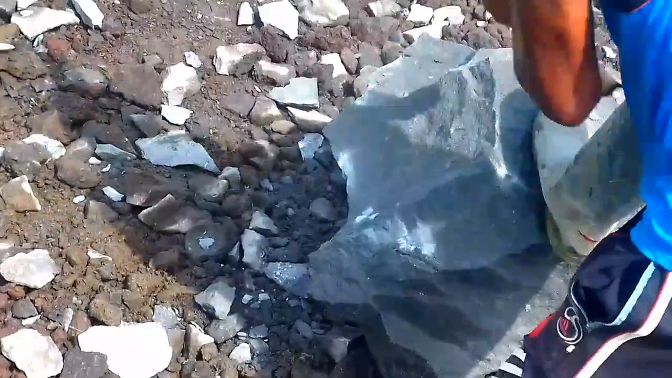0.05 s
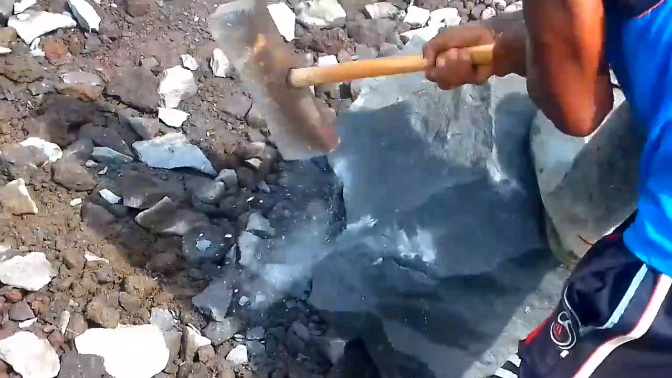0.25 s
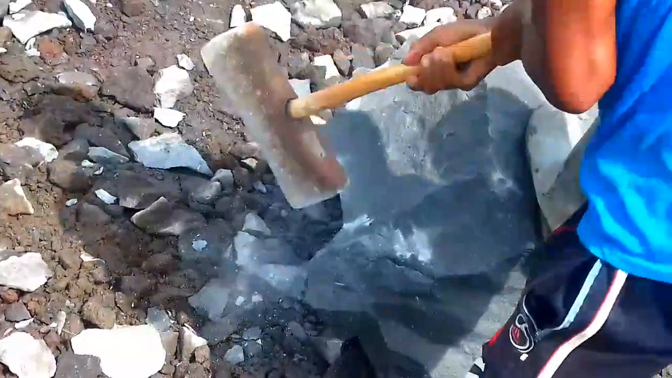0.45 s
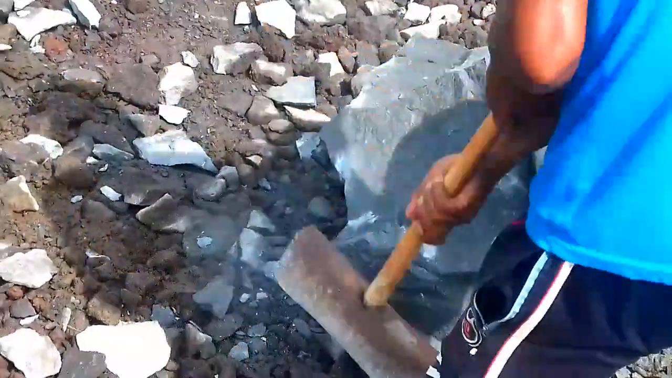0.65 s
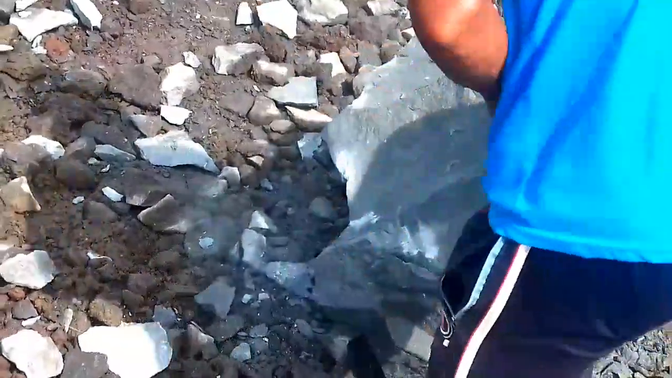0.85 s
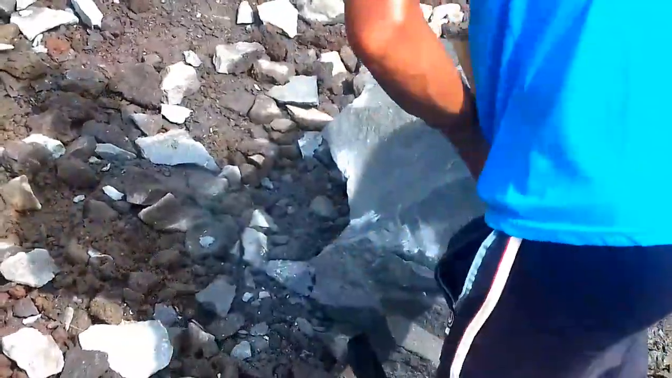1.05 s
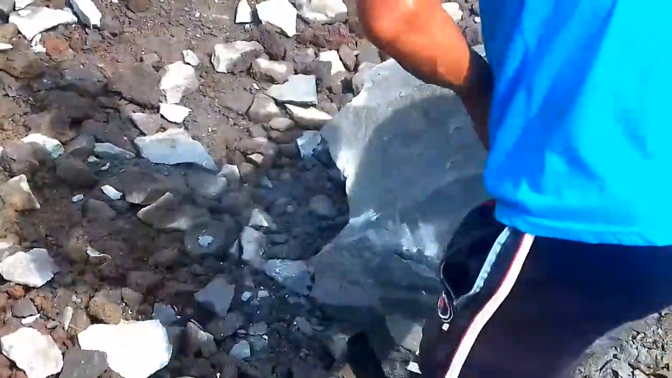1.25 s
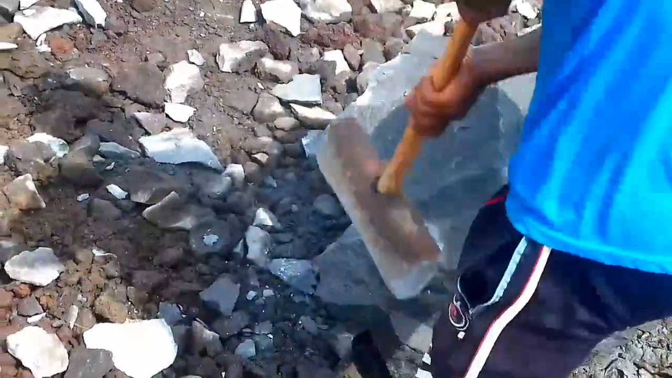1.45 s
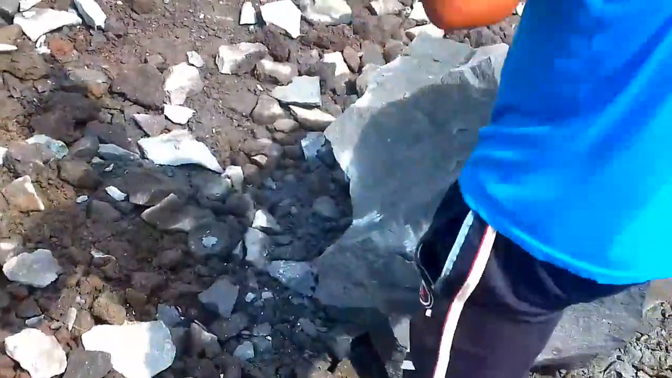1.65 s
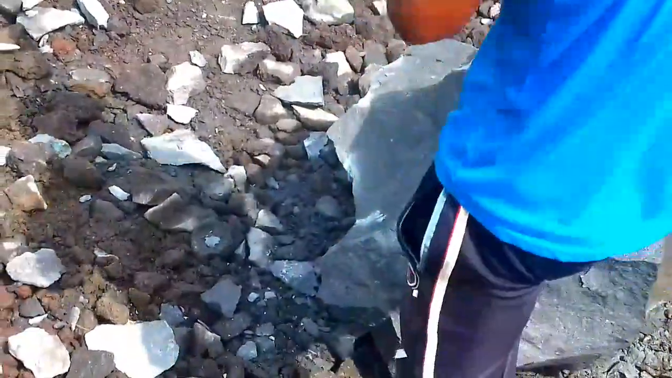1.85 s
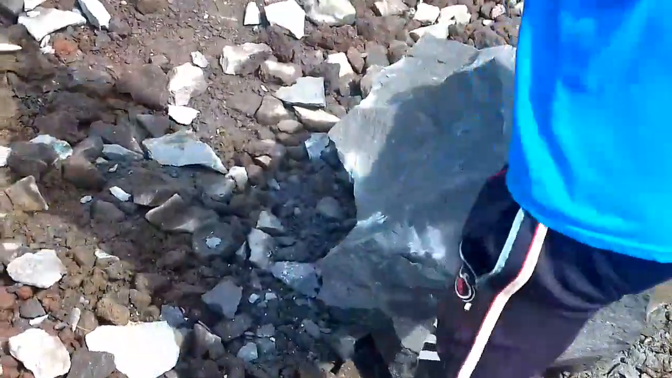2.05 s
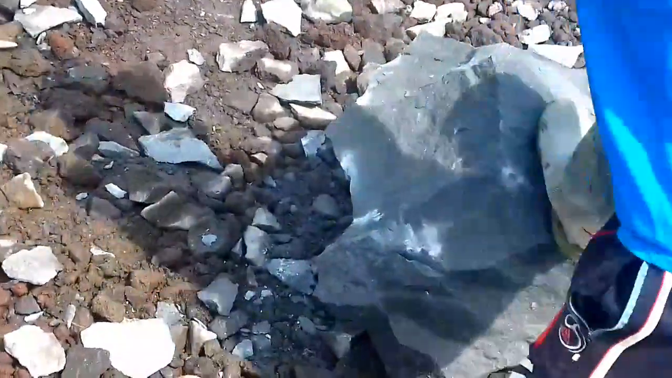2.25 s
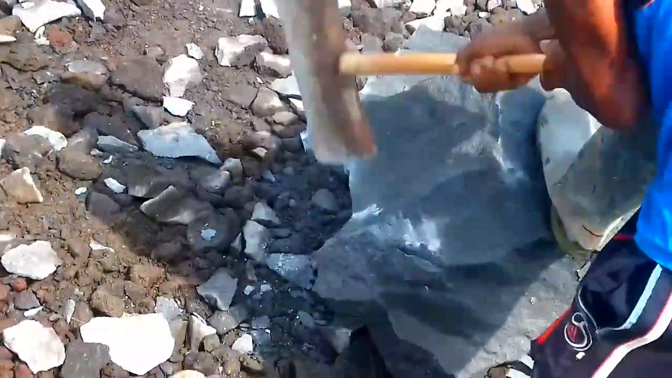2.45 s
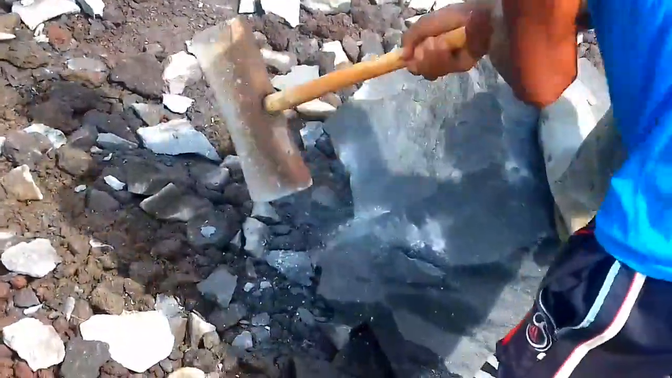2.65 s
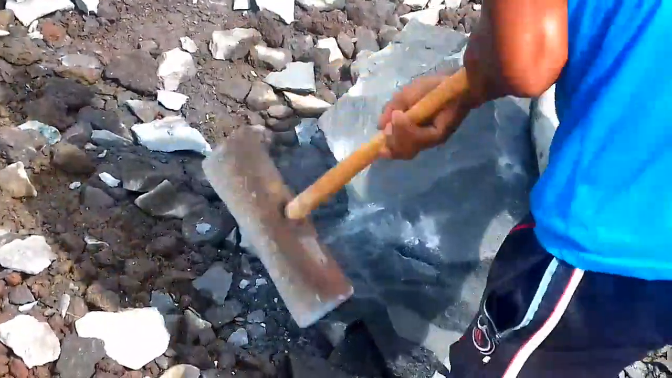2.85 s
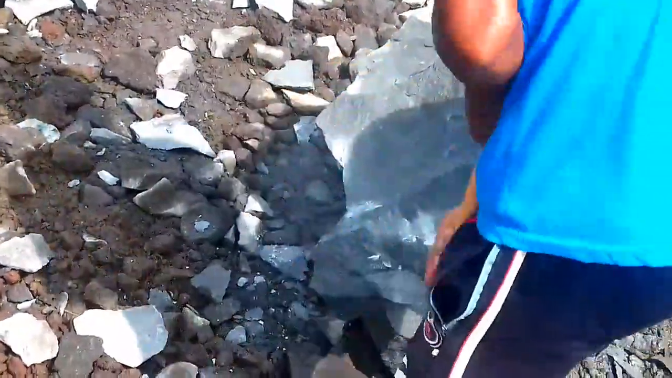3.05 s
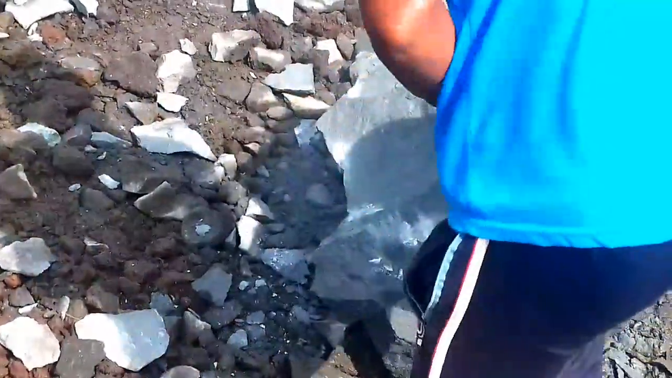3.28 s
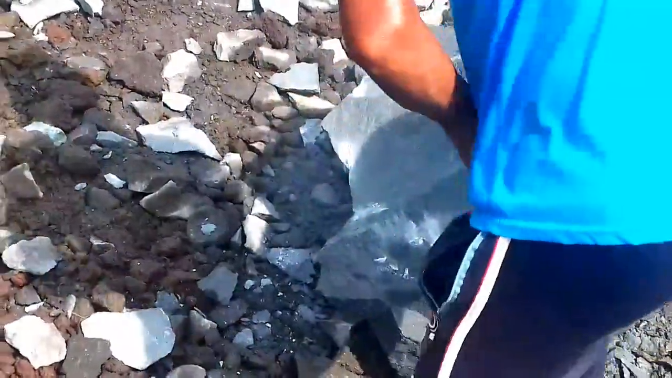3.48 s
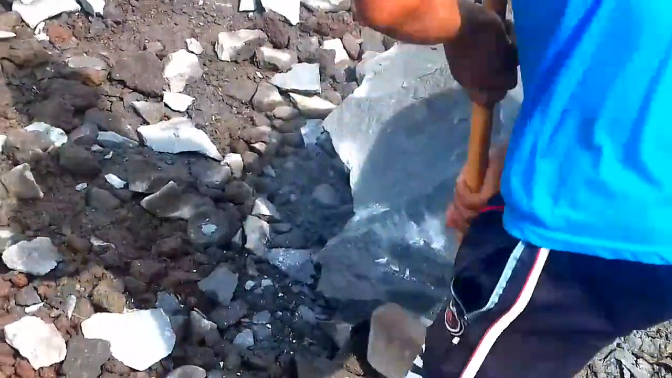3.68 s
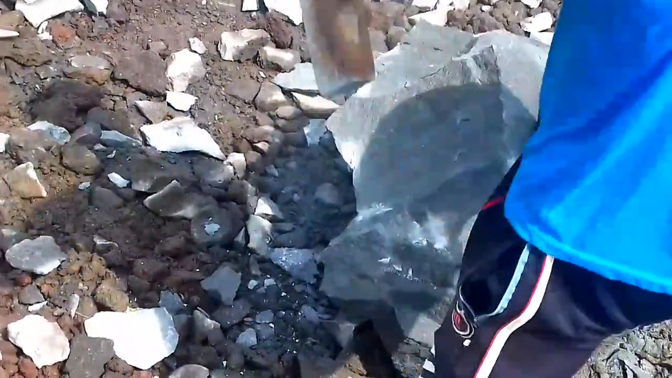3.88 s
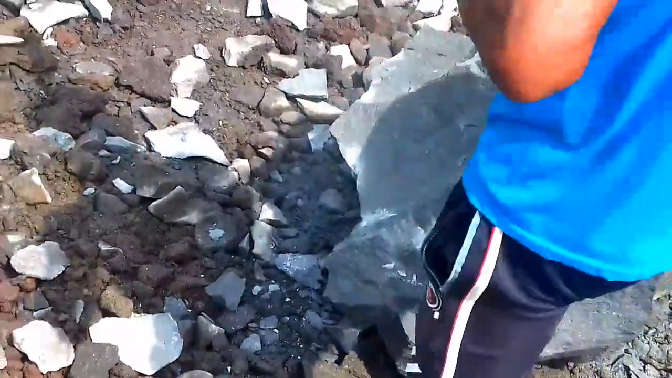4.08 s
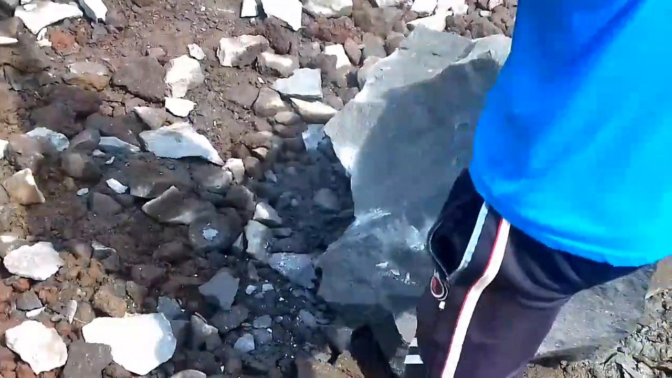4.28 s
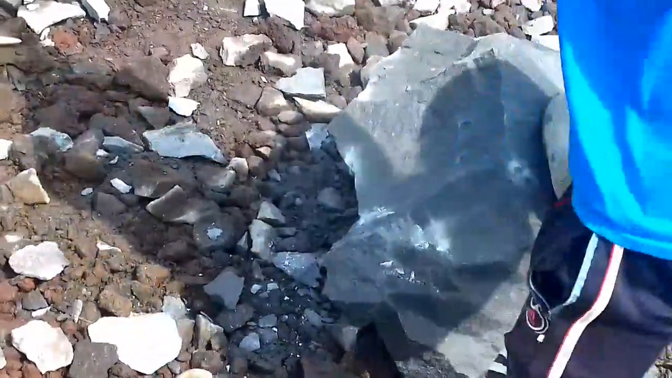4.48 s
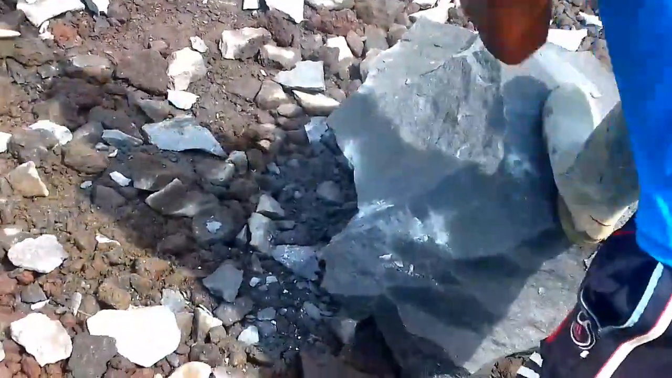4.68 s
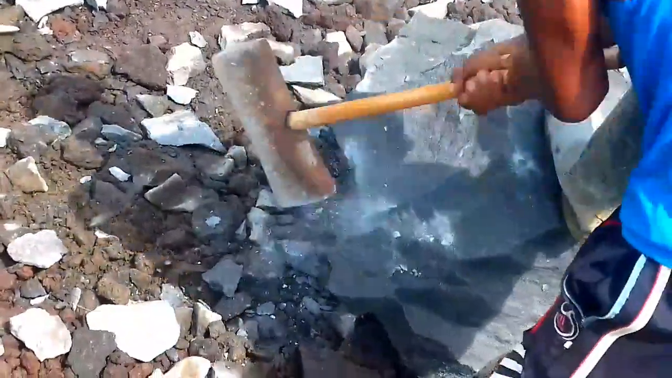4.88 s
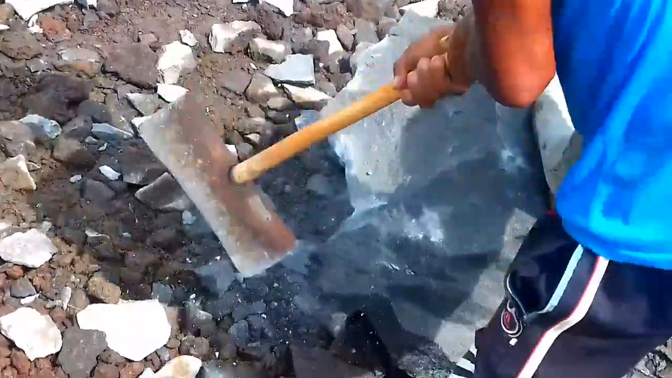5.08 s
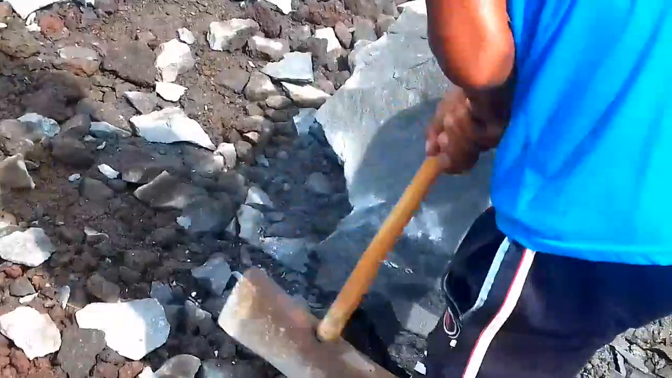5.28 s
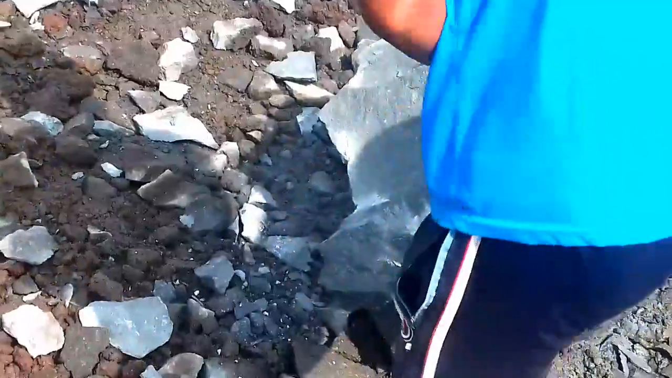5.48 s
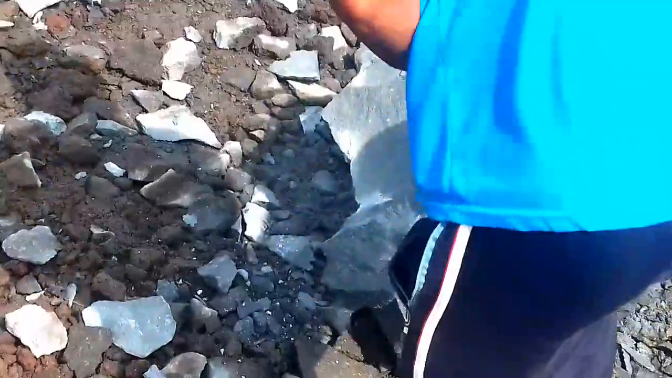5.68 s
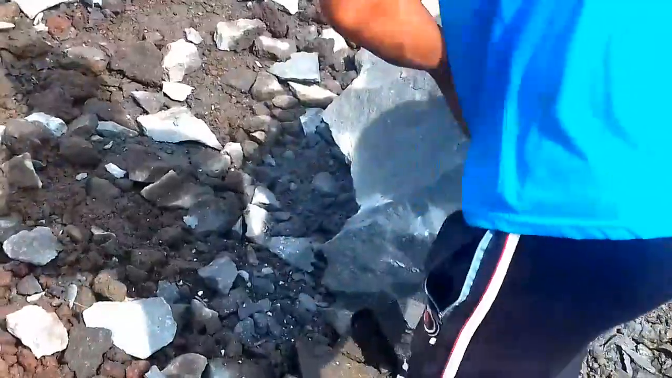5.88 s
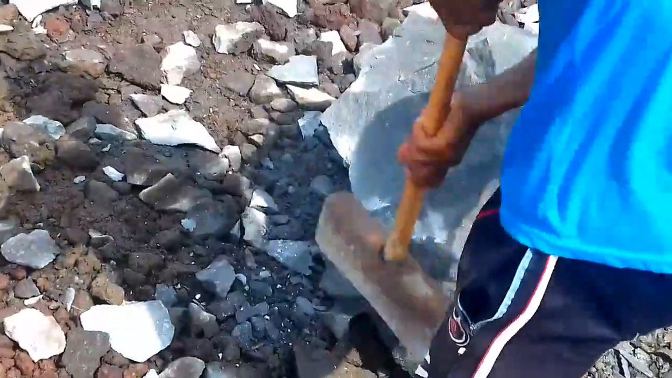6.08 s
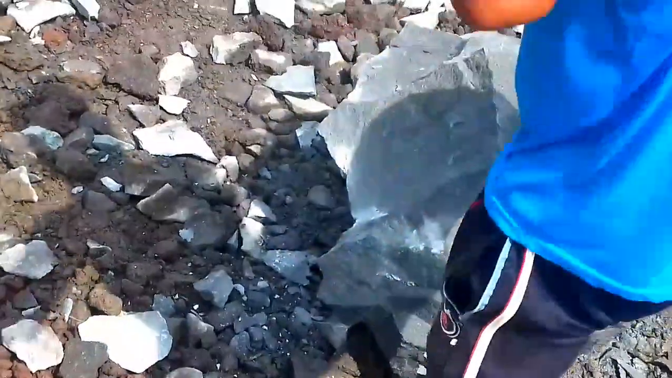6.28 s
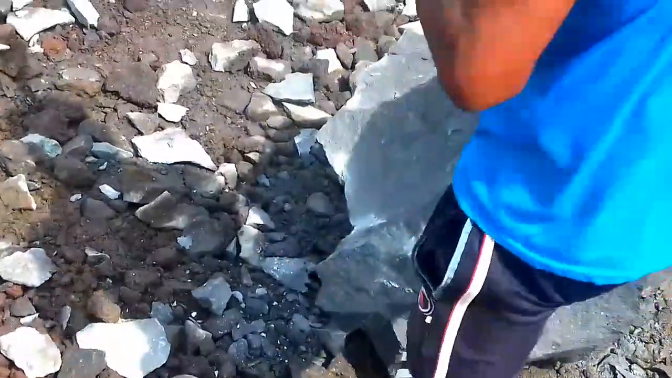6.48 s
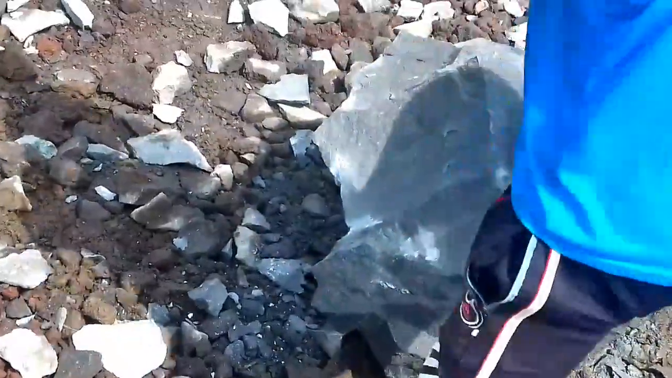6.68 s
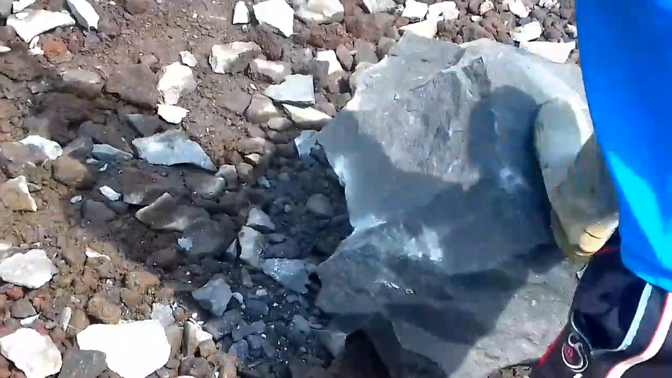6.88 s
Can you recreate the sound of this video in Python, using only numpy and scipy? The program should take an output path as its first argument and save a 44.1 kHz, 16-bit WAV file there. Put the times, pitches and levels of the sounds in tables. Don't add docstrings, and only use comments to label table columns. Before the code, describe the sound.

Outdoors in a quarry, a sledgehammer strikes a boulder three times, over two seconds apart, each a hard clipped crack with a short boom and a high, wavering steel ring. From the second blow on, a lighter hammer knocks stone about every half second, bright and dry with faint wall echoes. Chips click, a boot briefly scuffs grit, and a far engine drones. A close phone microphone ducks after blows, and hiss creeps back.

```python
import sys
import numpy as np
from scipy import signal
from scipy.fft import rfft, irfft
from scipy.io import wavfile
from scipy.ndimage import uniform_filter1d

SR = 44100
rng = np.random.default_rng(int(sys.argv[2]) if len(sys.argv) > 2 else 0)


def elevation(decibels):
    levels = np.asarray(decibels, float)
    return 10 ** (levels / 20)


def store_wav(level_fs):
    pcm = np.round(np.clip(np.atleast_2d(level_fs), -1, 1) * 32767)
    wavfile.write(sys.argv[1], SR, pcm.T.astype(np.int16))


N = 305613


def evened(x):
    return x / np.sqrt(np.mean(x ** 2) + 1e-20)


def read(points, hz):
    f, value = np.transpose(points)
    return np.interp(np.log(hz + 1), np.log(f + 1), value)


def add(mix, s, sound):
    part = mix[round(s * SR):][:len(sound)]
    part += sound[:len(part)]


def swell(t, rise_s):
    return -np.expm1(-t / rise_s)


def colour_of(x, colour):
    gain = elevation(read(colour, np.fft.rfftfreq(len(x), 1 / SR)))
    return evened(irfft(rfft(x) * gain, len(x)))


def noise(colour, size):
    return colour_of(rng.standard_normal(size), colour)


def band(lo_hz, hi_hz, size):
    return noise([(lo_hz / 1.6, -40), (lo_hz, 0), (hi_hz, 0), (hi_hz * 1.4, -40)], size)


def fuzzy(hz, width_hz, size):
    away = (np.fft.rfftfreq(size, 1 / SR) - hz) / width_hz * 2
    return evened(irfft(rfft(rng.standard_normal(size)) / (1 + away ** 2), size))


def mode(hz, db, t60, t):
    return elevation(db - 60 * t / t60) * np.sin(2 * np.pi * hz * t)


def dying(colour, t60s, rise_s, size):
    hz, t, z = signal.stft(noise(colour, size), SR, nperseg=256)
    decay = elevation(-60 * t / read(t60s, hz)[:, None])
    tail = signal.istft(z * decay, SR, nperseg=256)[1][:size]
    return tail * swell(np.arange(size) / SR, rise_s)


# pitch_hz, level_db (per Hz)
BOULDER = [(190, -39.5), (330, -4.5), (458, -3), (635, -8), (1070, 0), (1350, -1), (2030, -1), (3060, -17),
           (4680, -11), (5790, -28.5), (13300, -41), (16500, -63)]


def bite(crack_db, t):
    jolts = 0
    for at, db in [(0, 4), (.002, -2.5), (.005, -9.5), (.008, -20.5)]:
        jolts = jolts + elevation(db - 60 * (t - at) / 0.018) * (t > at)
    return elevation(crack_db - 1.5) * noise(BOULDER, len(t)) * jolts * swell(t, 0.00068)


# pitch_hz, t60_s
BOULDER_T60 = [(100, 0.069), (400, 0.1), (1200, .13), (2500, 0.069), (4500, .05), (6500, 0.016),
               (15000, .008)]


def boulder_boom(boom_db, hollow_db, thump_db, t):
    boom = elevation(boom_db + 6.5) * dying(BOULDER, BOULDER_T60, 0.0038, len(t))
    hollow = elevation(hollow_db - 60 * t / .08) * band(750, 900, len(t)) * swell(t, 0.018)
    thump = elevation(thump_db + 4.5 - 60 * t / 0.076) * band(150, 330, len(t)) * swell(t, .003)
    return boom + hollow + thump


def splinter_spray(grit_db, t):
    ticks = rng.standard_normal(len(t)) * (rng.random(len(t)) < 900 / SR)
    colour = [(200, -28), (600, -7.5), (1500, -3), (2300, -9), (3200, -26.5), (5500, -43.5), (7500, -89.5)]
    return elevation(grit_db - 60 * t / 0.22) * colour_of(ticks, colour) * swell(t, 0.0059)


HEAD_HZ = [3760, 4585, 7997, 8415, 9120, 14160, 4398]
# t60_s, then level_db at each of the three blows
HEAD = [(0.12, -28, -25, -32.5), (0.18, -19.5, -16.5, -33), (0.19, -43.5, -47.5, -56),
        (0.41, -57.5, -50, -67.5), (0.24, -45, -44, -50.5), (.16, -54, -61, -76), (.1, -40.5, -51.5, -51)]


def head_ring(blow, t):
    rate_hz = rng.uniform(2.9, 10, (len(HEAD), 1))
    phase = rng.uniform(0, 0.72, (len(HEAD), 1))
    waver = 1 - 0.27 * np.cos(2 * np.pi * (rate_hz * t + phase))
    ring = 0
    for hz, (t60, *db), w in zip(HEAD_HZ, HEAD, waver):
        ring = ring + elevation(db[blow] - 60 * (t / t60) ** 1.5) * np.sin(2 * np.pi * hz * t) * w
    return ring * -np.expm1(-(t / 0.02) ** 2)


SLEDGE_AT = [
    .2736,
    2.6073,
    4.9545,
]
# crack_db, boom_db, grit_db, hollow_db, thump_db
SLEDGE = [
    (-2.5, -20, -45, -19.5, -22.5),
    (-3.5, -23, -44.5, -18.5, -32.5),
    (-5, -26, -30, -19, -35),
]


def sledge():
    out, t = np.zeros(N), np.arange(16384) / SR
    for blow, (s, levels) in enumerate(zip(SLEDGE_AT, SLEDGE)):
        crack_db, boom_db, grit_db, hollow_db, thump_db = levels
        stone = bite(crack_db, t) + boulder_boom(boom_db, hollow_db, thump_db, t)
        add(out, s, stone + splinter_spray(grit_db, t) + head_ring(blow, t))
    return out


# level_db (as it lifts off), t60_s
SING_BLOW = [
    (-19.5, 1.274),
    (-24, 1.46),
    (-24, 1.414),
]
# start_s (centre), depth_db, width_s
TURNS = [(.331, -7, 0.0082), (.387, -12.5, 0.018), (.45, -5, 0.024), (.5, -7, 0.021), (.605, -6, 0.054),
         (0.652, -24, 0.036), (.825, -11, .05), (.87, -32, 0.027), (.955, -18, 0.011), (1.036, -1, 0.0078),
         (1.093, -14, .03), (1.17, -26, 0.083), (1.245, -20, 0.061), (1.315, -19, 0.05),
         (2.705, -26, 0.024), (2.725, -16, 0.012), (2.882, -2.5, 0.021), (3.09, -7, 0.032),
         (3.117, -10, 0.024), (3.178, -24, 0.032), (3.22, -22, 0.036), (3.335, -11, 0.014),
         (3.58, -16, 0.16), (3.69, -14, .04), (5.09, -4.5, 0.047), (5.3, -10, 0.075), (5.519, -12, 0.034),
         (5.615, -8, .015), (5.756, -22, 0.029), (5.97, -19, .04)]
SING_HZ, SING_LIFT_S, SING_END_S = 5432, 0.025, 1.19


def sing():
    out, t = np.zeros(N), np.arange(round(SING_END_S * SR)) / SR
    edges = -np.expm1(-(t / SING_LIFT_S) ** 3) * np.clip((SING_END_S - t) / 0.017, 0, 1)
    for s, (db, t60) in zip(SLEDGE_AT, SING_BLOW):
        add(out, s, edges * mode(SING_HZ, db, t60, t))
    for s, depth_db, width_s in TURNS:
        near = slice(round((s - .3) * SR), round((s + .3) * SR))
        away = ((np.arange(N)[near] / SR - s) / width_s) ** 2
        out[near] *= np.sqrt(1 - (1 - elevation(2 * min(depth_db, 0))) * np.exp(-away))
    return out


KNOCK_HZ, KNOCK_T60 = 4500, 0.019


def stone_knock(body_db, thud_db, treble_db, t):
    thud_hold = elevation(15 * np.minimum(t, .03) / KNOCK_T60)
    stone = elevation(body_db) * band(1000, 2400, len(t))
    stone += elevation(thud_db + 3) * band(190, 850, len(t)) * thud_hold
    knock = fuzzy(KNOCK_HZ, 1400, len(t)) + elevation(treble_db) * band(5000, 12000, len(t))
    knock = knock * elevation(-60 * t / KNOCK_T60) + stone * elevation(-48 * t / KNOCK_T60)
    return knock * swell(t, .0005)


def beating_twins(hz, db, split_hz, share, t60, t):
    twins = mode(hz, db, t60, t)
    twins += np.clip(share, -1, 1) * mode(hz + split_hz, db, 1.44 * t60, t)
    linger_db = db - 31
    return twins + elevation(linger_db - 60 * t / 0.25) * fuzzy(hz + split_hz / 2, 60, len(t))


LIGHT_HZ = [7260, 8850, 9200, 11100, 13130, 10550, 15140, 4200, 1930, 2250]
# level_db, t60_s
LIGHT_HEAD = [(-38.5, 0.04), (-36.5, 0.062), (-40, 0.091), (-43.5, 0.025), (-44, 0.039), (-40, 0.075),
              (-43, .07), (-35.5, 0.06), (-21, 0.041), (-33.5, 0.058)]


def upper_modes(t):
    upper = 0
    for hz, (db, t60) in zip(LIGHT_HZ, LIGHT_HEAD):
        blow_db = db + 4 * rng.standard_normal()
        upper = upper + elevation(blow_db - 60 * t / t60) * fuzzy(hz, 110, len(t))
    return upper


TAP_AT = [2.316, 2.8523, 3.3868, 4.0745, 4.6058, 5.1246, 5.6417, 6.1615, 6.6757]
# crack_db, then against it body_db, thud_db, treble_db
TAPS = [(-4, -19.5, -35, -22), (-9, -11.5, -24, -31), (-7.5, -20, -44, -31), (-8.5, -10.5, -28.5, -24),
        (-5.5, -10.5, -35.5, -26), (-8.5, -18, -34, -25), (-10.5, -19.5, -25.5, -27),
        (-9.5, -10.5, -26, -21.5), (-5.5, -11, -23, -27.5)]
# pitch_hz, level_db, split_hz, share (of the twin, -1 to 1), t60_s
TWINS = [(3665, -12, 27, 0.52, 0.069), (3610, -24, 34, 0.97, 0.056), (3610, -13.5, 65, -0.71, 0.062),
         (3670, -13.5, 64, 0.56, 0.042), (3597, -9.5, 74, -0.28, 0.088), (3760, -20, 85, 0.65, 0.036),
         (3527, -19.5, 83, -1.03, 0.042), (3570, -11, 88, -0.96, .06), (3620, -9, 105, 0.95, 0.037)]
# pitch_hz, level_db (per Hz)
SCATTER = [(290, -58), (500, -29.5), (1200, -18), (1950, -17), (3160, -31.5), (3660, 0.5), (3880, -12.5),
           (5930, -30.5), (9060, -29), (15600, -40), (16500, -85.5)]
# pitch_hz, t60_s
SCATTER_T60 = [(800, 0.048), (2500, 0.35), (3600, 0.24), (4500, 0.6), (8000, 0.17), (15000, .08)]


def light_hammer():
    out, t = np.zeros(N), np.arange(12288) / SR
    for s, (crack_db, body_db, thud_db, treble_db), twin in zip(TAP_AT, TAPS, TWINS):
        knock = elevation(crack_db - 2.5) * stone_knock(body_db, thud_db, treble_db, t)
        upper_db = 0.47 * twin[1] + 0.58 * (treble_db + crack_db) + 19
        ring = beating_twins(*twin, t) + elevation(upper_db) * upper_modes(t)
        scatter = elevation(crack_db - 34.5) * dying(SCATTER, SCATTER_T60, 0.0027, len(t))
        add(out, s, knock + ring * swell(t, 0.00096) + scatter)
    return out


# start_s, pitch_hz, level_db, length_s
WALL = [(2.587, 3890, -42.5, 0.0064), (3.443, 3610, -34.5, 0.012), (3.758, 3720, -56.5, 0.012),
        (4.3228, 3670, -38.5, 0.006), (4.8378, 3605, -41.5, 0.008), (5.355, 3630, -55.5, 0.0085),
        (5.868, 3600, -51.5, 0.033), (6.383, 3630, -56, 0.036)]


def wall_returns():
    out, t = np.zeros(N), np.arange(12288) / SR
    for s, hz, db, length_s in WALL:
        echo = np.sin(2 * np.pi * hz * t) + .5 * fuzzy(hz + 100, 300, len(t))
        echo += elevation(-31.5) * fuzzy(LIGHT_HZ[1], 150, len(t))
        add(out, s, elevation(db) * echo * np.exp(-(t / length_s) ** 2) * swell(t, .001))
    return out


# start_s, level_db, pitch_hz, width_hz
CHIPS = [(.39, -45, 4230, 1500), (.66, -71, 5900, 900), (.79, -59, 4890, 2000), (.88, -59, 5400, 2500),
         (1.19, -62, 4400, 1500), (2.462, -50, 4600, 2000), (2.476, -48, 4400, 1000),
         (2.503, -40.5, 4420, 800), (2.521, -47, 4800, 2000), (2.54, -50, 4500, 1500),
         (2.715, -36, 4530, 1500), (3.3737, -33.5, 1840, 500), (3.374, -41.5, 4800, 2500),
         (3.445, -40, 1774, 1200), (5.003, -30.5, 4820, 2000), (5.035, -41, 2990, 3500),
         (5.059, -25.5, 5060, 2500), (5.075, -41, 4240, 1200), (5.074, -38.5, 1730, 1200),
         (5.113, -47, 4230, 1000), (5.235, -40, 4400, 2980), (5.28, -52, 5470, 2450),
         (5.312, -55, 4370, 2000), (5.772, -59.5, 4600, 2000), (5.886, -54, 4700, 1500),
         (6.11, -61.5, 4420, 1486)]


def chips():
    out, t = np.zeros(N), np.arange(1500) / SR
    t60, snap_db = 0.026, -22
    for s, db, hz, width_hz in CHIPS:
        click = colour_of(fuzzy(hz, max(width_hz, 100), len(t)), [(5800, -3.5), (8000, -25.5)])
        click += elevation(snap_db - 60 * t / t60) * band(7000, 14500, len(t))
        add(out, s, elevation(db - 60 * t / t60) * click * swell(t, 0.00071))
    return out


# start_s, level_db
SCUFF = [
    (3.22, -87),
    (3.252, -69.5),
    (3.308, -63.5),
    (3.338, -80),
    (3.34, -64),
]
# pitch_hz, level_db (per Hz)
SCUFF_COLOUR = [(2500, -42), (3300, -4), (4200, 5), (5800, 10.5), (6600, -14), (9000, -25), (11000, -60)]


def scuff():
    out = np.zeros(N)
    s, db = np.transpose(SCUFF)
    t = np.arange(s[0], s[-1], 1 / SR)
    brush = noise(SCUFF_COLOUR, len(t)) * signal.windows.tukey(len(t), .3)
    add(out, s[0], elevation(np.interp(t, s, db) + 10.0) * brush)
    return out


# start_s, gain_db, load_db
GAIN = [(0, -2.5, 0), (.27, -2, -6), (.44, -18, -9), (.8, -18.5, 0), (1.399, -22, 3.5), (1.619, -13, 4),
        (1.901, -2, 3.5), (2.3, 0.5, 2.5), (2.37, -10, -1.5), (2.602, -5, -1.5), (2.801, -21.5, -1.5),
        (3.85, -19, 1), (4.58, -5.5, -1.2), (4.95, -10.5, -3), (5.25, -21, -6), (6.12, -20, 0.5),
        (6.66, -6.5, -5), (6.93, -15, 1)]


def gain_and_load():
    s, *columns = np.transpose(GAIN)
    t = np.arange(N) / SR
    return [np.interp(t, s, column) for column in columns]


# pitch_hz, level_db (per Hz)
WASH = [(150, -28.5), (250, -2.5), (354, -3.5), (385, -4.5), (569, -7), (645, -10), (2000, -8.5),
        (2460, -15.5), (3080, -32.5), (3540, -18), (3690, -20), (4300, -20.5), (7000, -44), (9100, -74.5),
        (15400, -120)]
# pitch_hz, width_hz, level_db
ENGINE = [(102, 20, -3.5), (208.6, 22, -1.5), (151, 150, 0), (279, 230, -3.5)]
# pitch_hz, width_hz, level_db (over the wash)
WHINES = [(3436, 2.1, -19), (3460, 12, -32)]


def far_engine(gain, load):
    wash_db = -44 + gain
    engine_db = -42 + 0.84 * gain + 0.14 * load
    rumble_db = -50 + .9 * gain + 1.3 * load
    flutter = uniform_filter1d(uniform_filter1d(rng.standard_normal(N), 1500), 1500)
    wash = noise(WASH, N) * elevation(evened(flutter) + 1)
    wash += sum(elevation(db) * fuzzy(hz, width_hz, N) for hz, width_hz, db in WHINES)
    orders = evened(sum(elevation(db) * fuzzy(hz, width_hz, N) for hz, width_hz, db in ENGINE))
    return elevation(wash_db) * wash + elevation(engine_db) * orders + elevation(rumble_db) * fuzzy(51, 9, N)


def phone_hiss(gain):
    hiss = noise([(4000, -19), (6500, -0.5), (15200, 0), (15800, -47)], N)
    hiss += elevation(-12 - 5 * np.arange(N) / SR) * fuzzy(13715, 12, N)
    return elevation(-66.5 + 1.02 * gain) * hiss


def scene():
    gain, load = gain_and_load()
    hammers = sledge() + sing() + light_hammer() + wall_returns()
    mix = hammers + chips() + scuff() + far_engine(gain, load) + phone_hiss(gain)
    return np.tile(mix, (2, 1))


def roll_off(x):
    return signal.sosfilt(signal.butter(12, 16730, fs=SR, output="sos"), x)


# pitch_hz, level_db (under a faint mid)
SIDE_LEAK = [(60, -31), (300, -17), (1000, -9.5), (3000, -13.5), (7000, -16.5), (15000, -10.5)]
CLIP = .51


def record(dry):
    cut = signal.sosfilt(signal.butter(2, 42, "high", fs=SR, output="sos"), dry[0])
    mid = CLIP * np.tanh((np.abs(cut) / CLIP) ** 10) ** (1 / 10) * np.sign(cut)
    mid = signal.oaconvolve(mid, signal.firwin(41, 15600, fs=SR), "same")
    hz, t, z = signal.stft(mid, SR, nperseg=512)
    faint = elevation(-80)
    size = faint * (abs(z) / faint) ** 0.45
    scrambled = size * np.exp(2j * np.pi * rng.random(z.shape))
    scrambled *= elevation(read(SIDE_LEAK, hz))[:, None]
    side = signal.istft(scrambled, SR, nperseg=512)[1][:N]
    return roll_off(np.array([mid + side, mid - side]))


dry = scene()
out = record(dry)
store_wav(out)
```